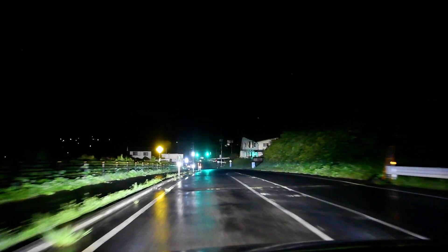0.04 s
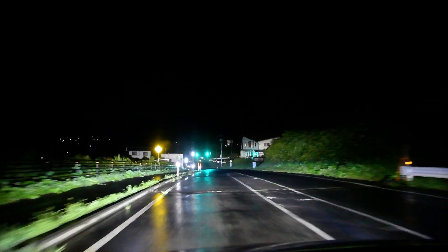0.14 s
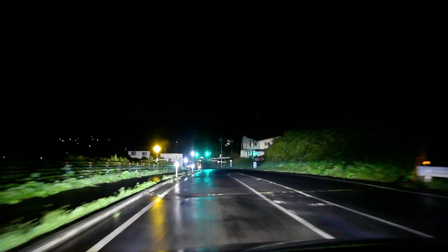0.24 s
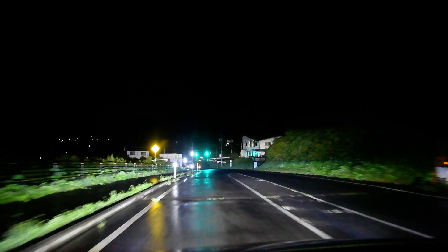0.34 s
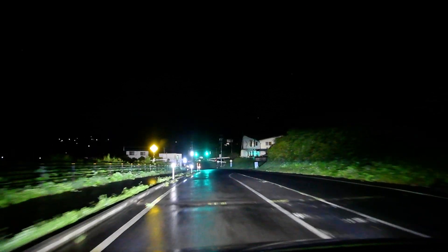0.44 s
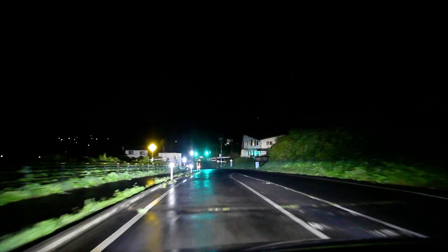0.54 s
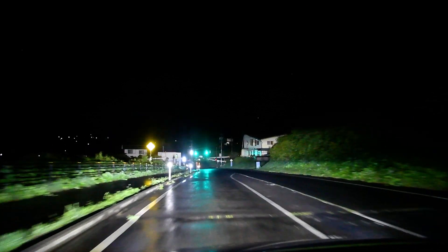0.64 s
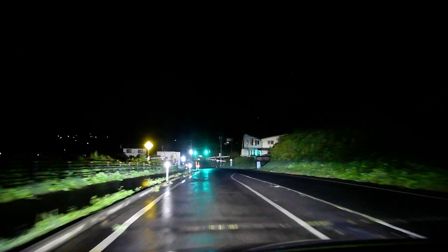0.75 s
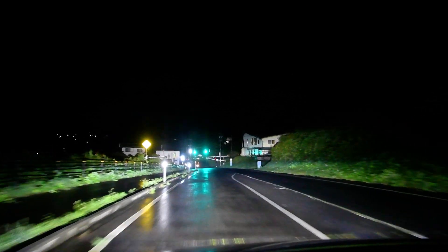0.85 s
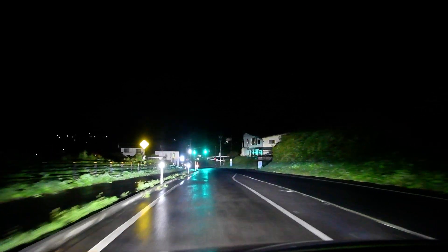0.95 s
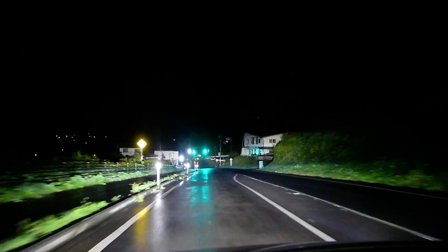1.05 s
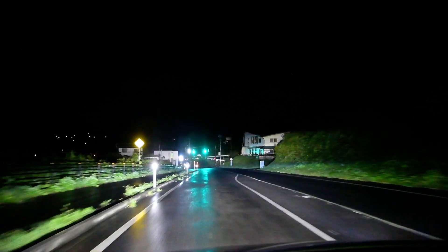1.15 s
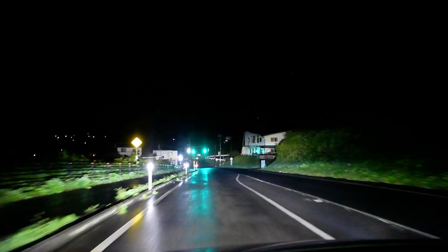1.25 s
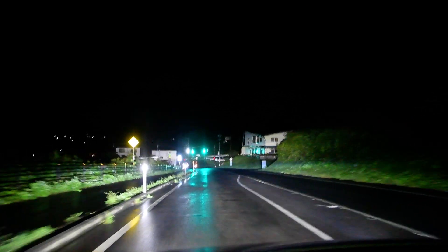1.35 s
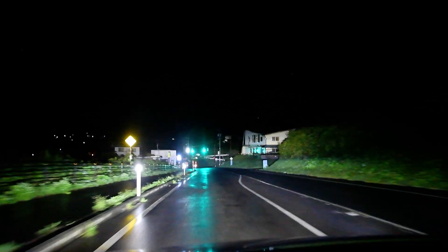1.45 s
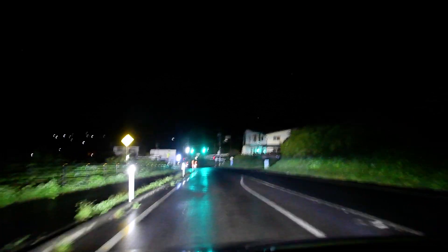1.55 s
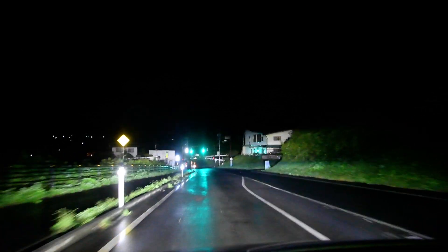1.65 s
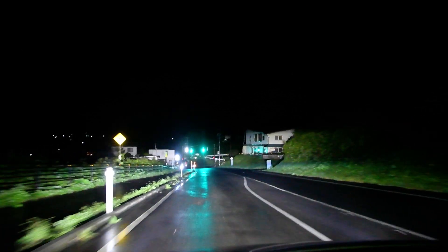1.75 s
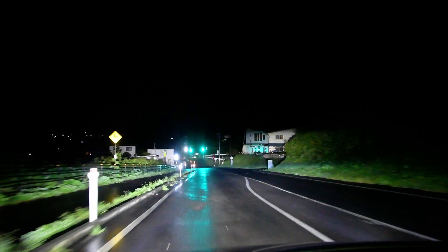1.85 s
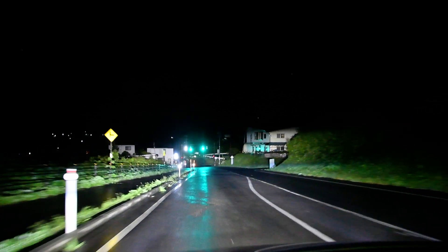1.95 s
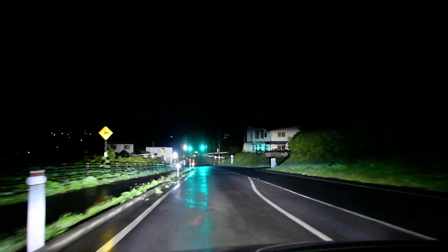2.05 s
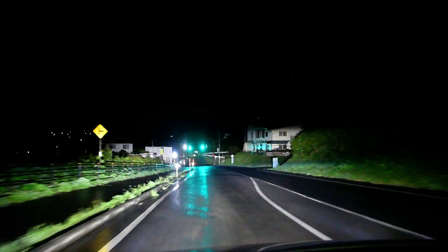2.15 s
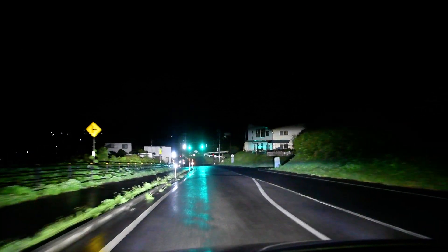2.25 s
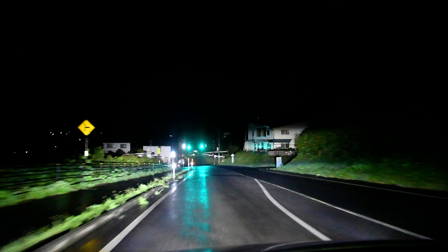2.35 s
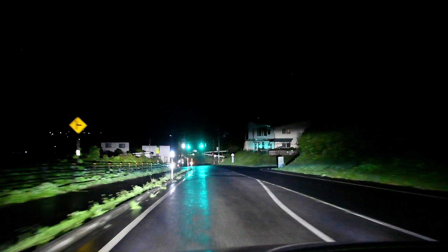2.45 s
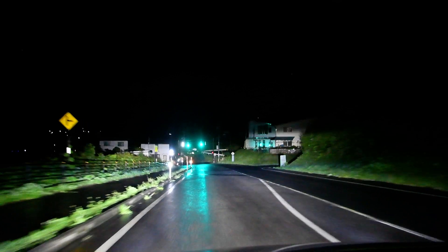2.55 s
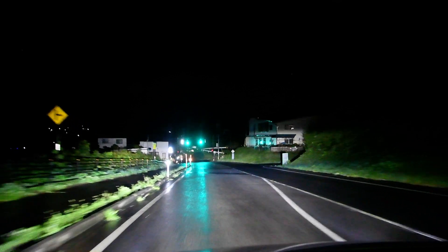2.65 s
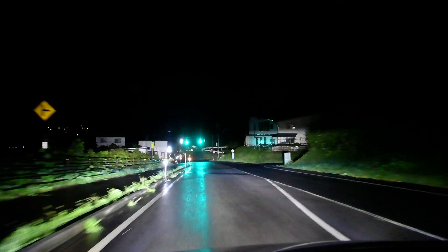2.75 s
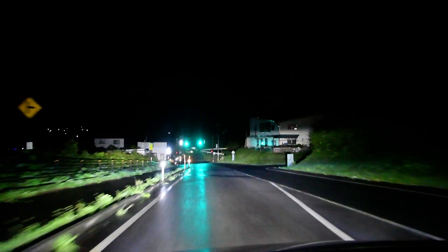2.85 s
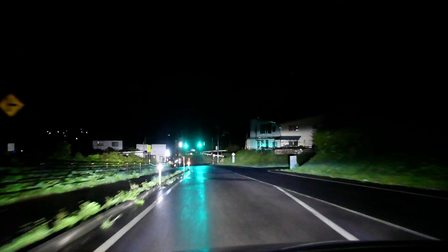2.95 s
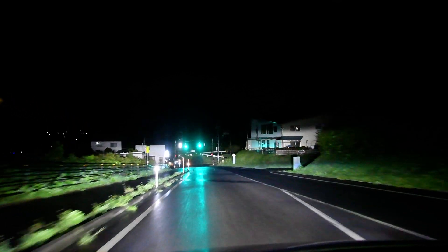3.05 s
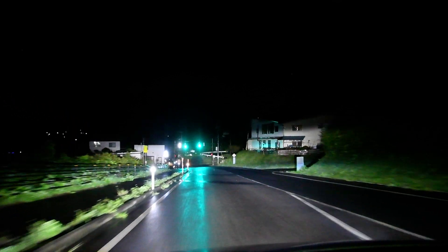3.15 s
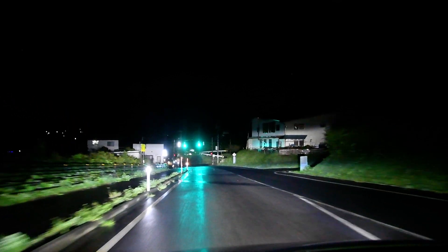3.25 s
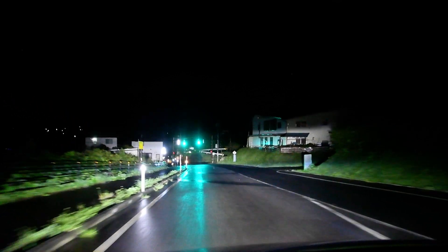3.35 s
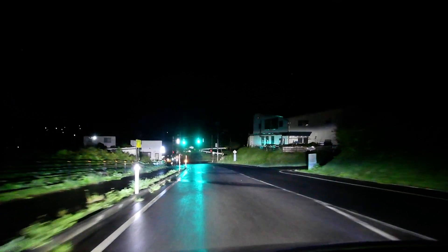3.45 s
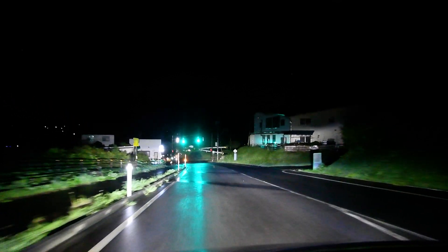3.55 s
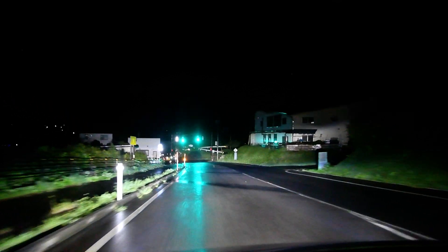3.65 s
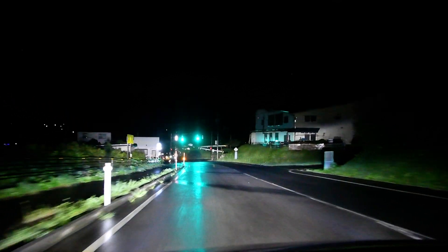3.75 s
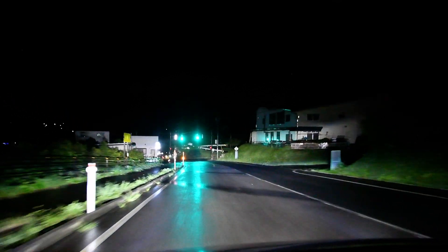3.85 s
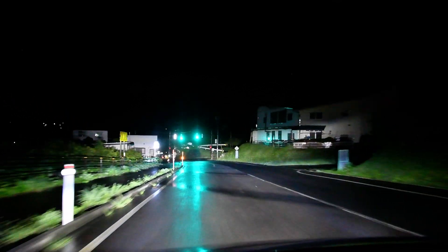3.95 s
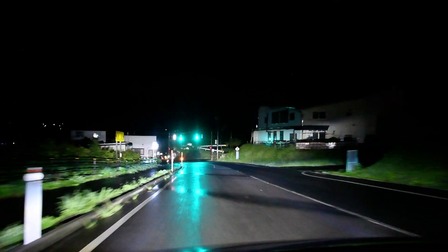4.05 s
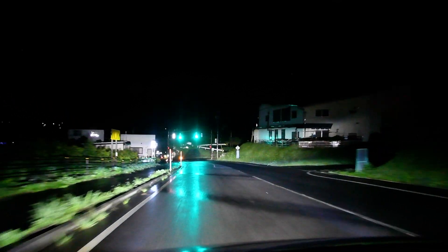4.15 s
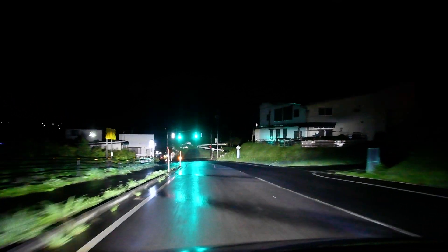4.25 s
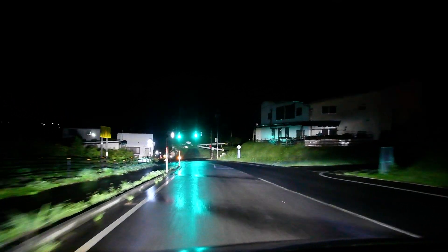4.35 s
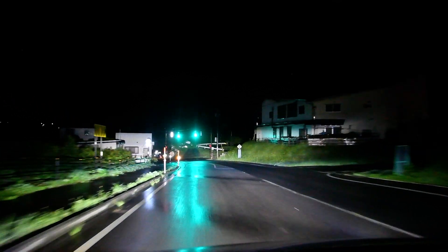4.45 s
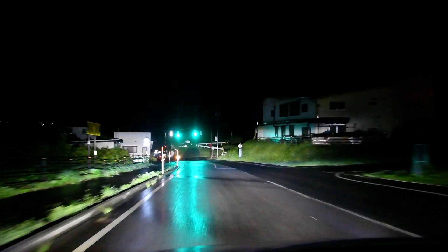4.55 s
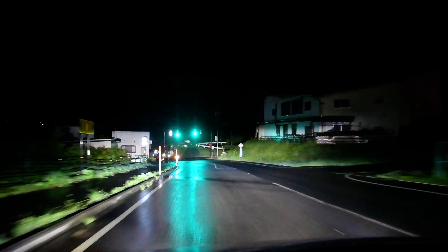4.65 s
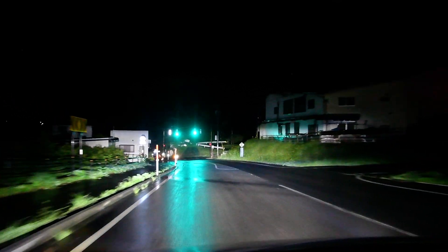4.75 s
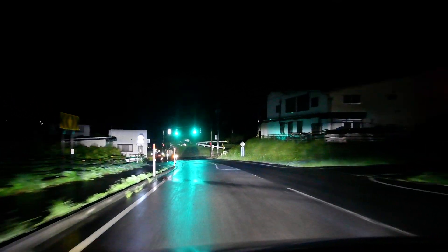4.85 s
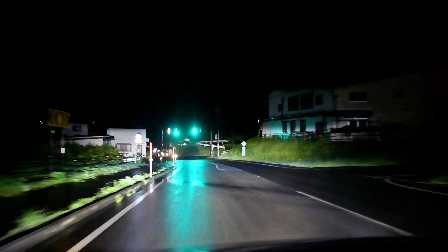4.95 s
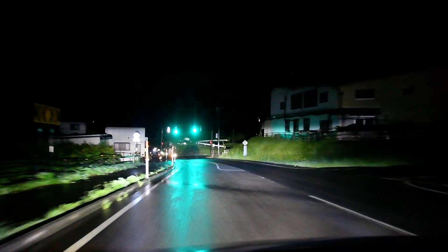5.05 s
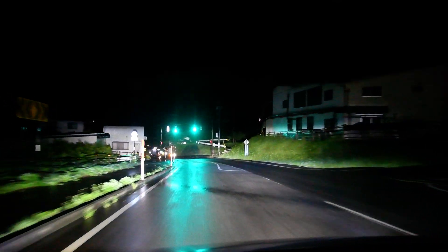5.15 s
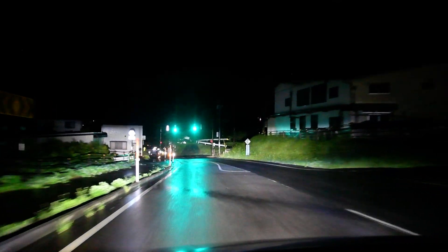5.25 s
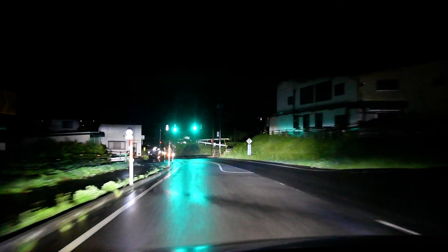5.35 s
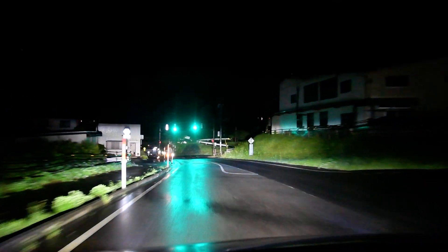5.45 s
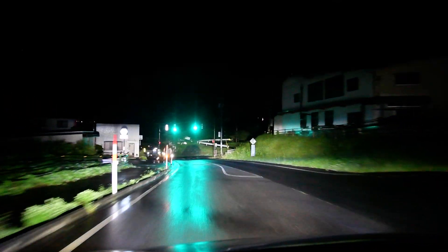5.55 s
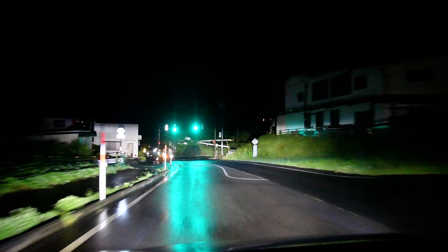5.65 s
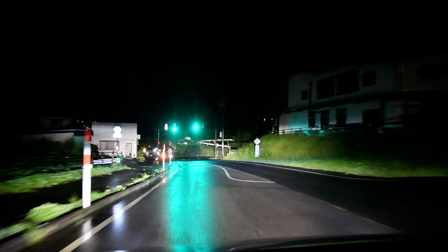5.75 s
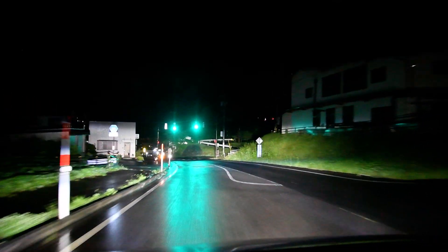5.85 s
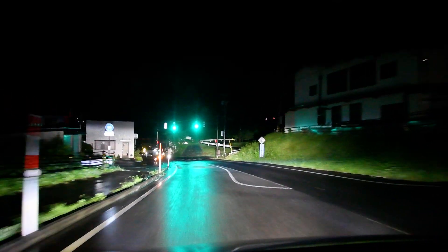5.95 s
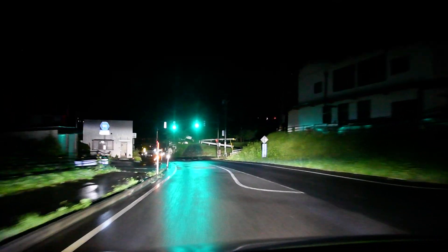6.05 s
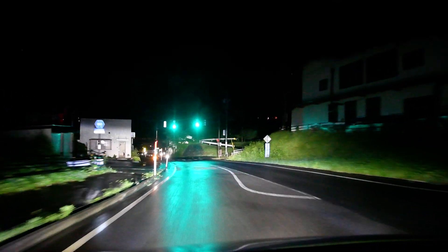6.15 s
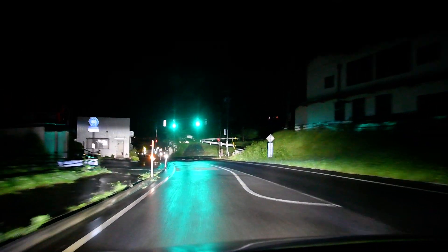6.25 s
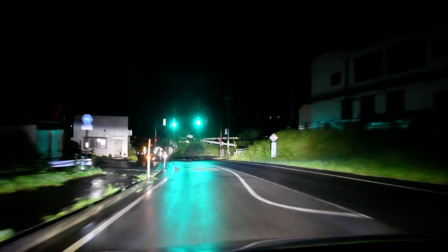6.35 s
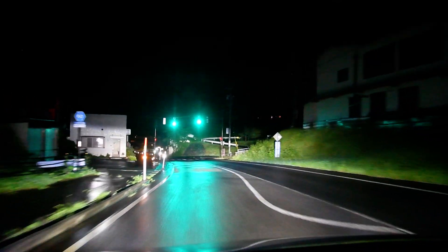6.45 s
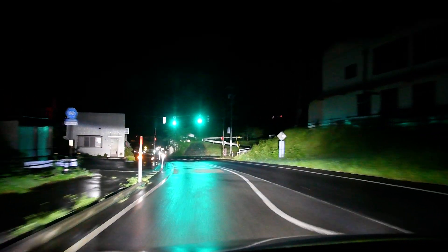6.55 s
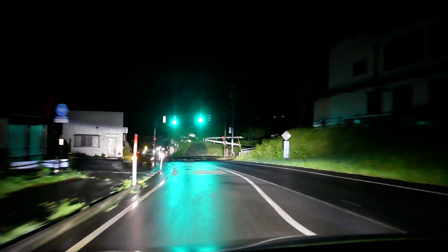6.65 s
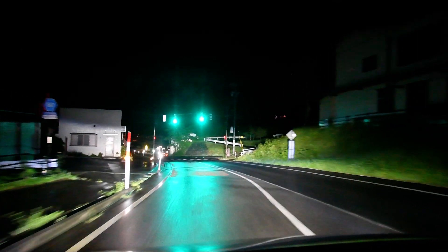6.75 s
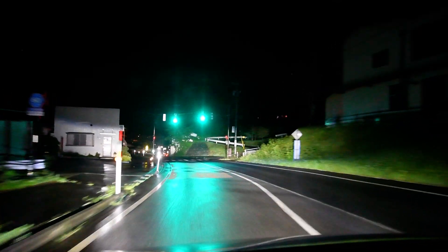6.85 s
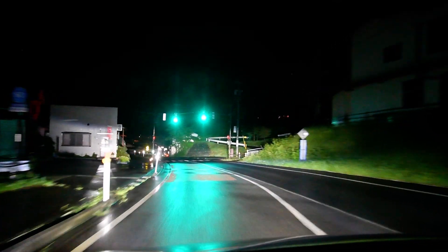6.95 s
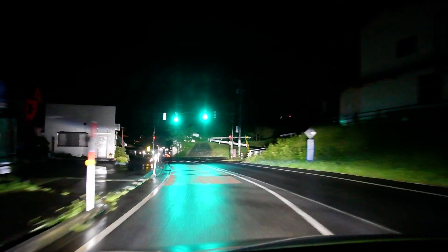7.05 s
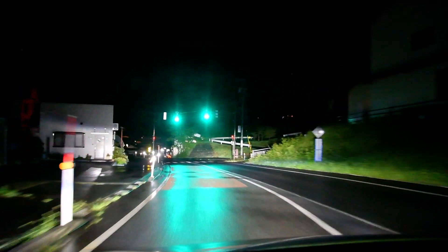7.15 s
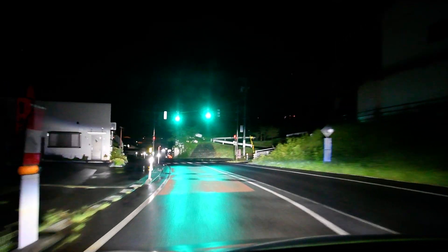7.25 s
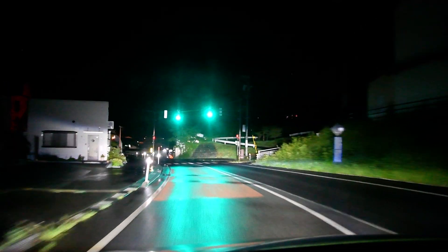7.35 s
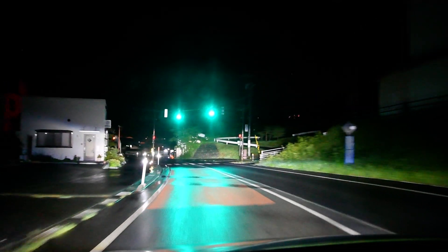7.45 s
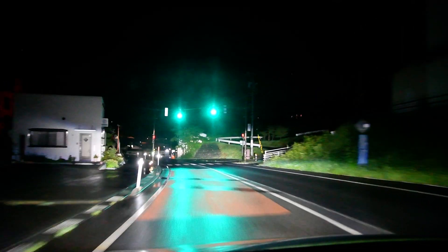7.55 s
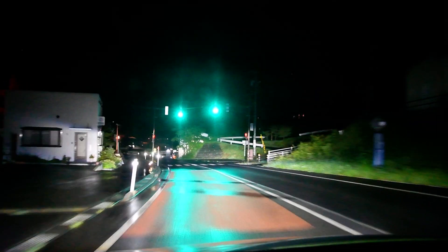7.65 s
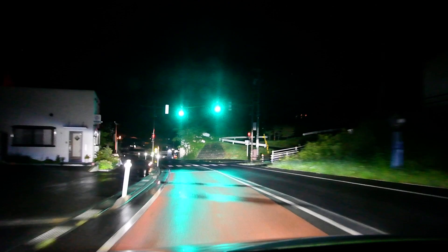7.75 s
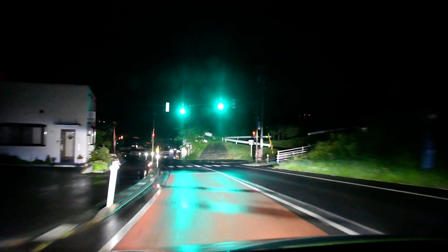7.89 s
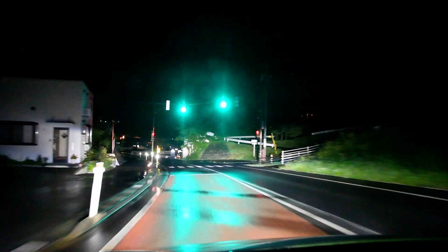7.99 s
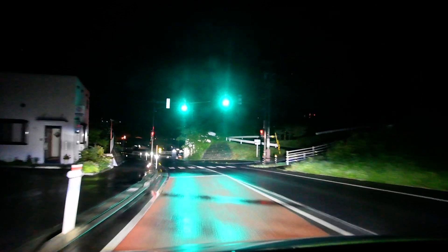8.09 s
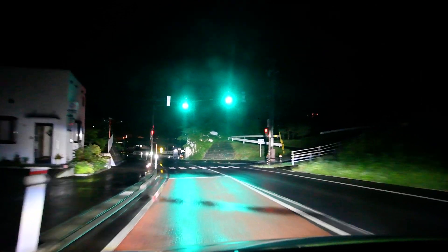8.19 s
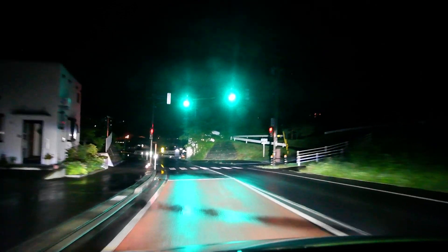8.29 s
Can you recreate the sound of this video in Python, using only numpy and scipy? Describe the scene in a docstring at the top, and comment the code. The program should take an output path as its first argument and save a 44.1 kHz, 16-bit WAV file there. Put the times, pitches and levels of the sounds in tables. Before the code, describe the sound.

Inside a car on a wet night road, a deep rumble and low engine hum continue; two heavy thumps lead onto coarser, boomier asphalt.

```python
"""A deep rumble and a low engine hum fill a car rolling along a wet road and easing off.
Soon both axles thump over a joint onto coarser asphalt: the cabin booms and the tyres ring.
Filtered noise makes the rumble, the tyre roar, the spray and the soft brushing; sine waves make the hum.
Knocks are fading low tones and noise bursts, trim ticks and snaps are short noise bursts,
and a thin electronic whine is two very high sine tones."""
import sys
import numpy as np
from scipy import signal
from scipy.fft import rfft, irfft
from scipy.io import wavfile
from scipy.ndimage import uniform_filter1d

SR = 44100
rng = np.random.default_rng(int(sys.argv[2]) if len(sys.argv) > 2 else 0)


def digitize_waveform(pressure):
    """Quantize a signal to 16-bit integers and store it at the path in sys.argv[1].

    Rows of a 2-D input are taken as channels; values are limited to [-1, 1].
    """
    field = np.atleast_2d(pressure).T
    bounded = np.clip(field, -1, 1)
    quanta = np.round(bounded * 32767).astype(np.int16)
    wavfile.write(sys.argv[1], SR, quanta)


N = 366912
TIME, HZ = np.arange(N) / SR, np.fft.rfftfreq(N, 1 / SR)
# The front tyres, then the rear tyres, roll onto the coarse asphalt.
FRONT_CROSSES_S, REAR_CROSSES_S = 1.19, 1.414


def rumble(smooth_db=-27.5, coarse_extra_db=6.5, smooth_share=0.44, swell_db=1.0):
    """Road grain shakes the body; coarse asphalt shakes it harder and drives its resonances fully."""
    # Strength of the rumble by pitch. Each row: frequency in Hz, level in dB per Hz.
    rumble_colour = [(30, -38), (65, -14), (90, -6), (108, -5.5), (160, -1.5), (190, -1.5), (250, -7.5),
                     (300, -10.5), (350, -17), (600, -47), (2000, -95)]
    # Resonances of cabin air and tyre cavities. Each row: frequency in Hz, width in Hz, lift in dB.
    booms = [(93.2, 10, 6.5), (127.4, 19.4, 11.5), (150.5, 17, 5), (212.6, 15.3, 12.5)]
    coarse = coarseness()
    colour_db, boom_db = read(rumble_colour), resonances(booms)
    on_smooth = noise(colour_db + smooth_share * boom_db)
    on_coarse = noise(colour_db + boom_db)
    shake = np.sqrt(1 - coarse) * on_smooth + np.sqrt(coarse) * on_coarse
    level_db = smooth_db + coarse_extra_db * coarse + level_changes_db() + swell_db * wander(rate_hz=5.2)
    return amp(level_db) * steadied(shake, span_s=0.16)


def joint(thud_rise_s=0.024, slap_rise_s=0.0055, slap_t60_s=0.12):
    """Each wheel blow slaps the joint and sets the body's low modes swinging until they die away."""
    # Blows of the front axle, the rear axle and its rebound.
    # Each row: start in seconds, thud level in dB, slap level in dB.
    blows = [(1.219, -11.5, -15.5), (1.439, -14.5, -18), (1.502, -15.5, -25)]
    # The body's answer to a blow.
    # Each row: frequency in Hz, level in dB added to the thud, time to fade by 60 dB in seconds.
    body = [(35, -9, .55), (45.3, 5, 0.32), (57.3, 1, 0.24), (89.4, -3, 0.47), (124.2, -1, 0.28)]
    # Strength of the slap by pitch. Each row: frequency in Hz, level in dB per Hz.
    slap_colour = [(150, -17), (420, 3), (520, 2), (660, 14.5), (820, -1), (1100, -22), (1600, -11),
                   (2400, -14), (4000, -27), (9000, -45)]
    thud, slap_envelope = np.zeros(N), np.zeros(N)
    for s, thud_db, slap_db in blows:
        for hz, mode_db, t60_s in body:
            swing = np.sin(2 * np.pi * hz * (TIME - s))
            thud += amp(thud_db + mode_db) * blow(s, thud_rise_s, t60_s) * swing
        slap_envelope += amp(slap_db) * blow(s, slap_rise_s, slap_t60_s)
    return thud + slap_envelope * steadied(noise(read(slap_colour)), span_s=0.018)


def tyres():
    """Tread roar and the hiss of thrown water, both coloured by the car's panels and glass."""
    # Resonances of panels and glass. Each row: frequency in Hz, width in Hz, lift in dB.
    panels = [(419, 64, 5.5), (531, 29, 4.5), (767, 24, 3.5), (891, 24, 5.5), (960, 42, 3.5),
              (1206, 53, 4.5), (5350, 180, 5), (6500, 150, 5)]
    coarse, panels_db = coarseness(), resonances(panels)
    return tread_roar(coarse, panels_db) + water_hiss(coarse, panels_db)


def tread_roar(coarse, panels_db, smooth_db=-32.5, coarse_extra_db=1.72, db_per_s=0.1854, follow_share=0.34):
    """Tread beating on the road makes a roar that grows slowly and partly follows the rumble's level."""
    # Strength of the roar by pitch. Each row: frequency in Hz, level in dB per Hz.
    roar_colour = [(150, -17), (290, -0.5), (350, -6.5), (480, -3.5), (590, -7.5), (800, -9), (980, -10),
                   (1100, -14.5), (1250, -18), (1450, -22.5), (2200, -28.5), (6000, -86)]
    level_db = smooth_db + coarse_extra_db * coarse + db_per_s * TIME + follow_share * level_changes_db()
    return amp(level_db) * noise(read(roar_colour) + panels_db)


def water_hiss(coarse, panels_db, spray_db=-43, coarse_extra_db=-2.45, fizz_db=-54.0, patchy_db=0.36):
    """Tyres throw spray and finer fizz, more in puddles; coarse asphalt drains better, so less spray."""
    # Strength of spray and of fizz by pitch. Each row: frequency in Hz, level in dB per Hz.
    spray_colour = [(600, -13), (1400, -0.5), (1700, -1.5), (2400, 1.5), (2750, -4), (3100, -6), (3600, -3),
                    (4200, -5.5), (4900, -9), (5400, -10), (7200, -15), (10000, -25), (16000, -45)]
    fizz_colour = [(2000, -13), (4500, -3.5), (6500, -2.5), (7200, -2), (8500, 1), (9300, -0.5),
                   (10300, -7), (12500, -8.5), (14900, -10), (15600, -7), (16000, -29)]
    # Stretches with more standing water. Each row: middle in seconds, length in seconds, lift in dB.
    puddles = [(1.5, 0.24, 4), (5.05, .6, 1.6), (6.05, 0.61, 1.8)]
    puddles_db = sum(db * swell(s, length) for s, length, db in puddles)
    wetness_db = puddles_db + patchy_db * wander(rate_hz=9)
    spray = amp(spray_db + coarse_extra_db * coarse) * noise(read(spray_colour) + panels_db)
    fizz = amp(fizz_db) * noise(read(fizz_colour) + panels_db)
    return amp(wetness_db) * (spray + fizz)


def engine(second_db=-7, waver=0.0078, throb_db=3.5):
    """Firing hum and its octave, lower overall as the car slows, with a small rise on the way and at the end."""
    # Path of the engine. Each row: time in seconds, firing rate in Hz, level in dB.
    engine_path = [(0, 59, -34), (1.2, 58.6, -37), (3.2, 61.7, -36), (3.8, 54, -42), (5.5, 44.96, -41),
                   (7, 46, -42), (8.32, 46.4, -39)]
    s, firing_hz, path_db = np.transpose(engine_path)
    hz = np.interp(TIME, s, firing_hz) * (1 + waver * wander(rate_hz=1.9))
    level_db = np.interp(TIME, s, path_db) + throb_db * wander(rate_hz=5.4)
    turn = 2 * np.pi * np.cumsum(hz) / SR
    hum = np.sin(turn) + amp(second_db) * np.sin(2 * turn)
    return np.sqrt(2) * amp(level_db) * hum


def heave(start_db=-33.8, db_per_s=-0.57, paint_extra_db=9, paint_from_s=7.88):
    """The body buffets deeply on its springs and settles, then jumps in level on ridged paint."""
    # Strength of the buffeting by pitch. Each row: frequency in Hz, level in dB per Hz.
    heave_colour = [(8, -40), (23, -28), (31, -3), (45, -12.5), (62, -7.5), (80, -7), (130, -32),
                    (400, -78)]
    on_paint = TIME > paint_from_s
    level_db = start_db + db_per_s * TIME + paint_extra_db * on_paint
    return amp(level_db) * steadied(noise(read(heave_colour)), span_s=0.52)


def trim(tick_t60_s=0.0065, tick_right_db=9, snap_right_db=1):
    """Loose plastic knocks make tiny noise bursts: hard ticks, and snaps that rattle on briefly."""
    # Small hard ticks on the right. Each row: start in seconds, level in dB.
    tick_times = [(1.326, -23), (1.56, -26), (1.5964, -25), (1.6932, -22), (1.871, -26.5), (2.0874, -26.5),
                  (2.8006, -37)]
    # Plastic snaps. Each row: start in seconds, level in dB, time to fade by 60 dB in seconds.
    snap_times = [(1.253, -25.5, 0.028), (3.234, -24, 0.068), (5.4511, -43, 0.089)]
    # Strength of ticks and of snaps by pitch. Each row: frequency in Hz, level in dB per Hz.
    tick_colour = [(2000, -23), (4500, -8), (6200, -12), (7600, -21), (9300, 2), (10500, -16), (12500, -19),
                   (16000, -28)]
    snap_colour = [(1300, -25), (2200, 6.5), (4000, 5), (6200, 9.5), (7200, 2.5), (8700, 8.5), (10500, -1),
                   (13000, -13), (16000, -3)]
    tick_envelope = sum(amp(db) * blow(s, 0.00041, tick_t60_s) for s, db in tick_times)
    snap_envelope = sum(amp(db) * blow(s, 0.00055, t60_s) for s, db, t60_s in snap_times)
    ticks = tick_envelope * steadied(noise(read(tick_colour)), span_s=0.002)
    snaps = snap_envelope * noise(read(snap_colour))
    return ticks * rightward(tick_right_db) + snaps * rightward(snap_right_db)


def brushing(rasp_hz=4000, rasp_width_hz=860, grain_db=1.5, right_db=3.0, level_db=-3):
    """Fine friction, perhaps a hand sliding on the wheel: grainy noise strokes that swell and fade."""
    # Each row: middle in seconds, length in seconds, level in dB before level_db is added,
    # sharpness as treble lift in dB per octave, lift of the rasp in dB.
    stroke_table = [(1.485, 0.24, -36.5, -4, 2), (1.64, 0.4, -39, -4, 3), (2.572, 0.34, -37.5, -1.5, -4),
                    (4.23, .25, -55, 9, 0), (6.103, 0.092, -38, 8, 2), (6.27, 0.33, -51, 4, 0)]
    # Shared colour of the strokes. Each row: frequency in Hz, level in dB per Hz before sharpness and rasp.
    brush_colour = [(1200, -22), (2400, 0), (3100, -10.5), (4200, 2.5), (4900, -5), (5800, 0), (7500, -3.5),
                    (8800, 4), (10500, -5.5), (13000, -11), (16000, -24)]
    strokes = np.zeros((2, N))
    for s, length, db, sharpness, rasp_db in stroke_table:
        rasp = resonances([(rasp_hz, rasp_width_hz, rasp_db)])
        colour_db = read(brush_colour) + sharpness * np.log2(HZ + 1) + rasp
        strokes += amp(db) * swell(s, length) * noise(colour_db)
    grain = amp(level_db + grain_db * wander(rate_hz=270))
    return strokes * grain * rightward(right_db)


def whine(main_hz=15634, start_db=-64, db_per_s=1.1, right_db=22, flutter_db=-57.5, fast_share=0.65):
    """Electronics sing two thin tones; the main one creeps up and flutters differently in each channel."""
    # Complex numbers let the flutter disturb both the size and the phase of the tone.
    flutter = np.array([wander(rate_hz=18) + 1j * wander(rate_hz=20) + fast_share * wander(rate_hz=110)
                        for _ in range(2)])
    steady = amp(start_db + db_per_s * TIME) * rightward(right_db)
    size = steady + amp(flutter_db) * flutter / 2
    main = np.sqrt(2) * (size * np.exp(2j * np.pi * main_hz * TIME)).real
    faint = amp(-77) * np.sin(2 * np.pi * 14316 * TIME) * rightward(7)
    return main + faint


def coarseness(front_share=0.49, build_s=0.075):
    """Share of the road noise, 0 to 1, from tyres on coarse asphalt: the front pair first, then the rear."""
    front = np.clip((TIME - FRONT_CROSSES_S) / build_s, 0, 1)
    rear = np.clip((TIME - REAR_CROSSES_S) / build_s, 0, 1)
    return np.clip(front_share * front + (1 - front_share) * rear, 0, 1)


def level_changes_db(rougher_db_per_s=0.1548):
    """Lift in dB as the coarse stretch grows slowly rougher, plus brief rises and dips."""
    # Brief rises and dips in the rumble's level.
    # Each row: middle in seconds, length in seconds, lift in dB.
    rises_and_dips = [(1.77, 0.38, 2.5), (2.297, 0.82, -1.5), (2.96, 0.7, 2), (5.173, 0.086, 5.5),
                      (5.299, 0.059, 4.5), (5.565, 0.24, 3), (6.4, 1, -1.5), (7.36, 0.26, 3.5),
                      (7.85, 0.15, 3.5)]
    worsening_db = rougher_db_per_s * np.maximum(TIME - REAR_CROSSES_S, 0)
    return worsening_db + sum(db * swell(s, length) for s, length, db in rises_and_dips)


def noise(colour_db, left_lead_s=0.00013):
    """Stereo noise of rms 1 in the cabin: bass alike on both sides, treble diffuse."""
    # Likeness of the two channels. Each row: frequency in Hz, coherence (1 means identical).
    likeness = [(60, 0.96), (130, 1), (290, 0.96), (640, 0.71), (1000, 0.39), (1410, -0.016), (3100, -0.19),
                (6820, 0.11), (15000, -0.23)]
    # Left over right. Each row: frequency in Hz, level difference in dB.
    left_over_right = [(60, -0.6), (200, -0.5), (400, -1.4), (700, -1), (2400, -1.5), (4400, -.5),
                       (8000, 0.5), (9200, -4.5), (12000, -1)]
    a, b = rfft(rng.standard_normal((2, N)))
    same = np.clip(read(likeness), -1, 1)
    lean = amp(read(left_over_right) / 2)
    mid, side = a * np.sqrt(1 + same), b * np.sqrt(1 - same)
    # Bass reaches the left side first; the lead shrinks toward the treble.
    late = np.exp(-2j * np.pi * HZ * left_lead_s / (1 + (HZ / 400) ** 2))
    both = np.array([(mid + side) * lean, (mid - side) * late / lean])
    return evened(irfft(both * amp(colour_db), N))


def resonances(modes):
    """Lift in dB over frequency from a set of resonant peaks."""
    power = sum((amp(db) ** 2 - 1) / (1 + (2 * (HZ - hz) / width) ** 2) ** 1.78 for hz, width, db in modes)
    return 10 * np.log10(np.maximum(1 + power, 1e-3))


def blow(s, rise_s, t60_s):
    """Envelope of a knock at time s: a quick rise, then a fade of 60 dB in t60_s."""
    age = np.maximum(TIME - s, 0)
    fade = np.exp(-np.minimum(np.log(1000) * age / t60_s, 50))
    return (1 - np.exp(-age / rise_s)) * fade


def swell(s, length):
    """Smooth rise and fall, 0 to 1, centred on time s."""
    return np.cos(np.pi * np.clip((TIME - s) / length, -0.5, 0.5)) ** 2


def wander(rate_hz):
    """Random drift of rms 1, made by keeping only the slow part of noise."""
    return evened(irfft(rfft(rng.standard_normal(N)) * np.exp(-(HZ / rate_hz) ** 2), N))


def steadied(x, span_s):
    """Evens out chance swells longer than span_s, keeping the quick flutter."""
    power = uniform_filter1d((x ** 2).mean(0), max(int(span_s * SR), 1))
    return x / np.sqrt(abs(power) + 1e-12)


def rightward(db):
    """Channel gains for a source db louder on the right."""
    return amp(np.array([[-db], [db]]) / 2)


def read(points):
    """A table over frequency, joined on a log axis."""
    f, value = np.transpose(points)
    return np.interp(np.log(HZ + 1), np.log(f), value)


def evened(x):
    """Scales to rms 1."""
    return x / np.sqrt(np.mean(x ** 2) + 1e-20)


def amp(db):
    """Decibels to gain."""
    return 10 ** (np.asarray(db) / 20)


def scene():
    """Everything as heard at the windscreen."""
    return rumble() + joint() + tyres() + engine() + heave() + trim() + brushing() + whine()


def record(dry, low_cut_hz=27, edge_hz=16100):
    """The microphone loses the deepest bass; then a steep filter removes the highest treble."""
    bass_cut = signal.butter(6, low_cut_hz, "highpass", fs=SR, output="sos")
    thinned = signal.sosfilt(bass_cut, dry)
    treble_cut = signal.firwin(1023, edge_hz, window=("kaiser", 9), fs=SR)
    return signal.oaconvolve(thinned, treble_cut[None], "same", axes=1)


dry = scene()
out = record(dry)
digitize_waveform(out)
```